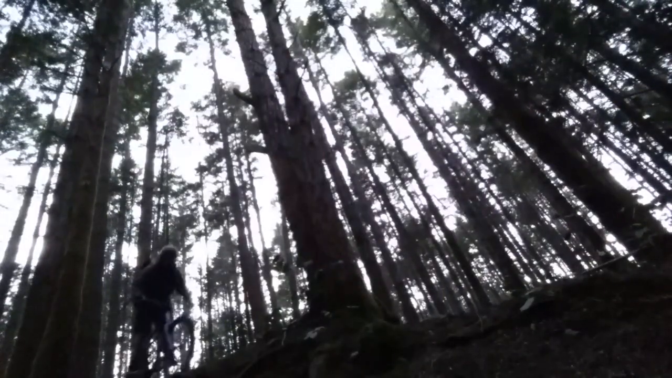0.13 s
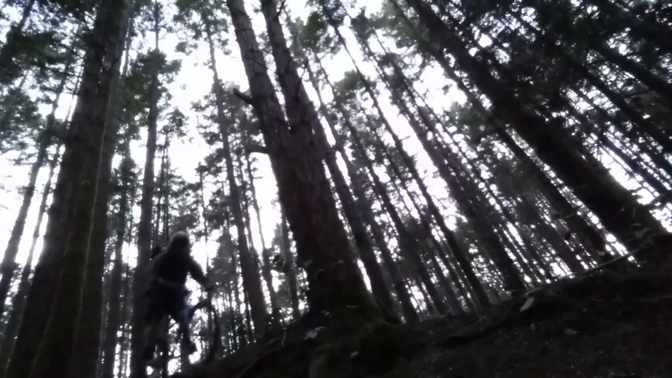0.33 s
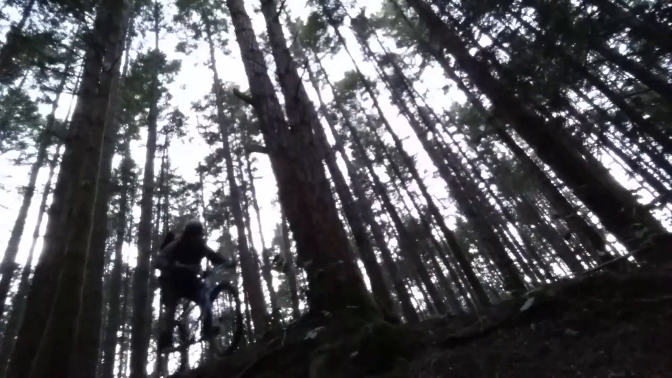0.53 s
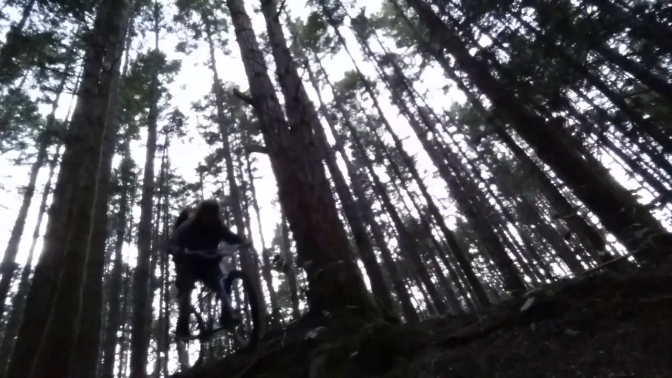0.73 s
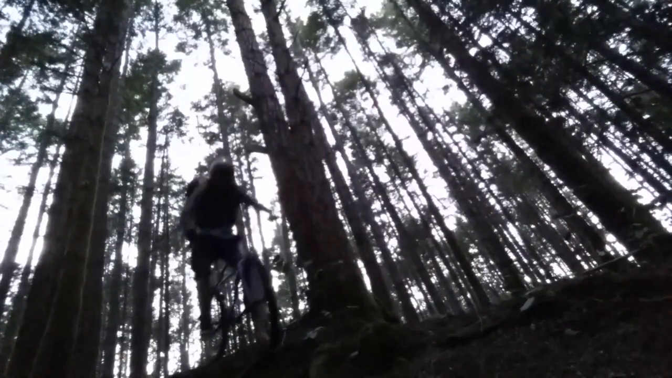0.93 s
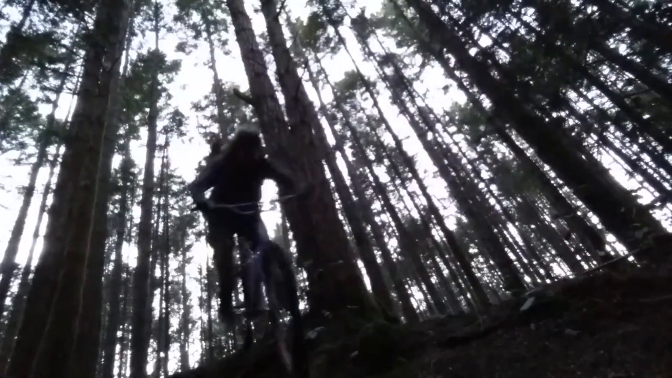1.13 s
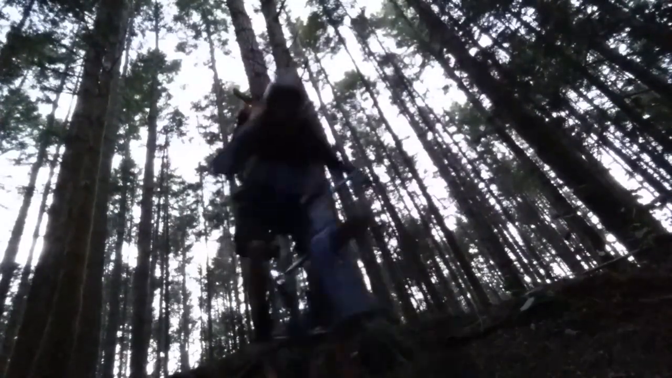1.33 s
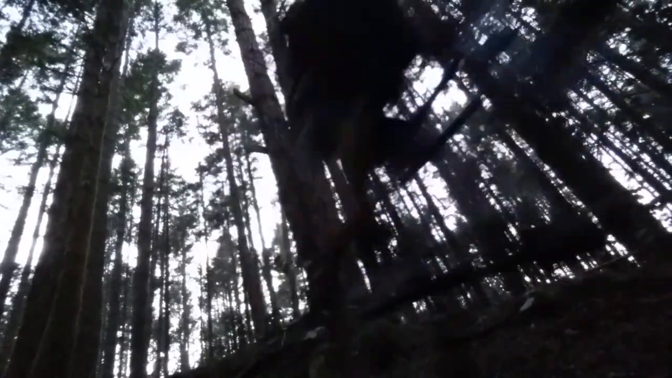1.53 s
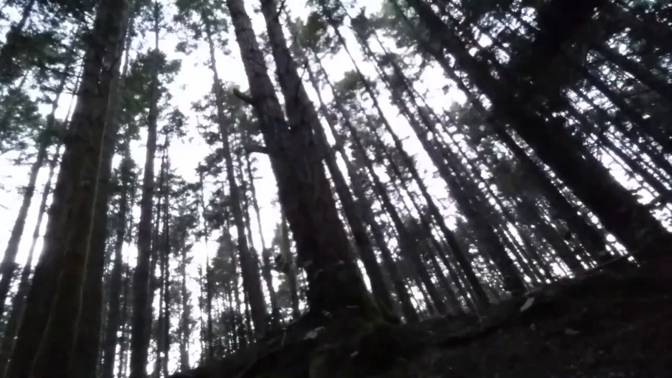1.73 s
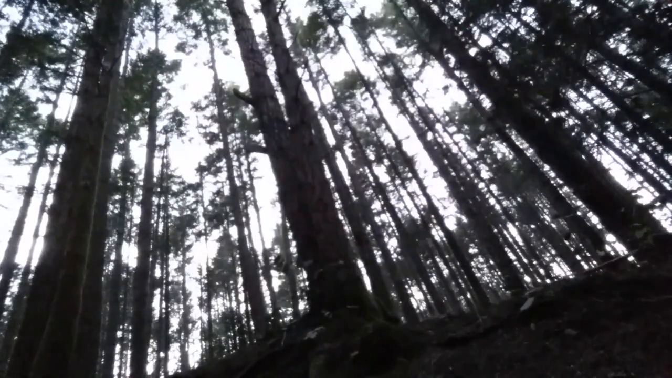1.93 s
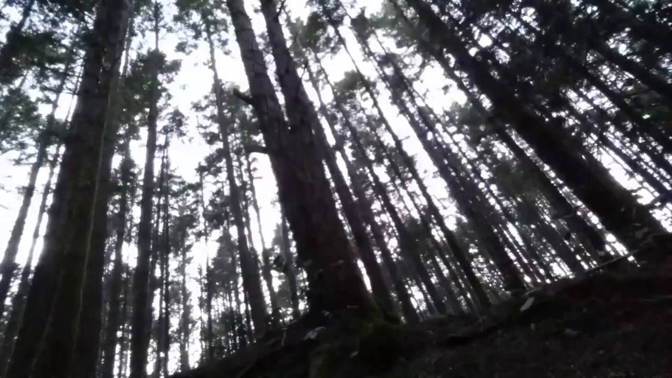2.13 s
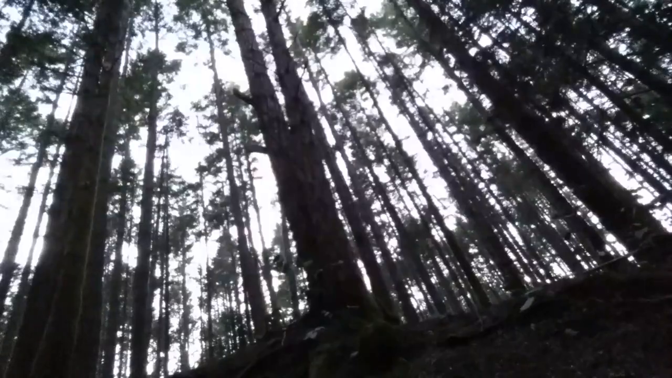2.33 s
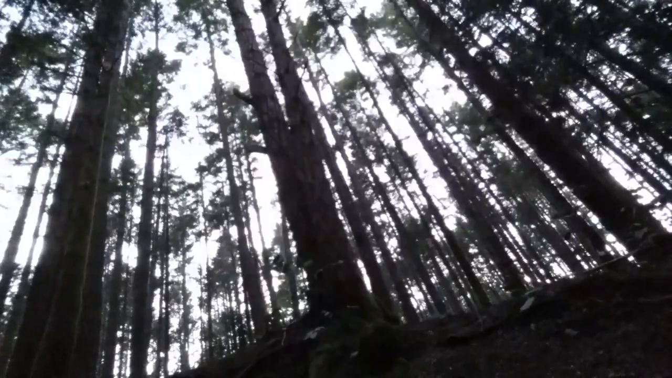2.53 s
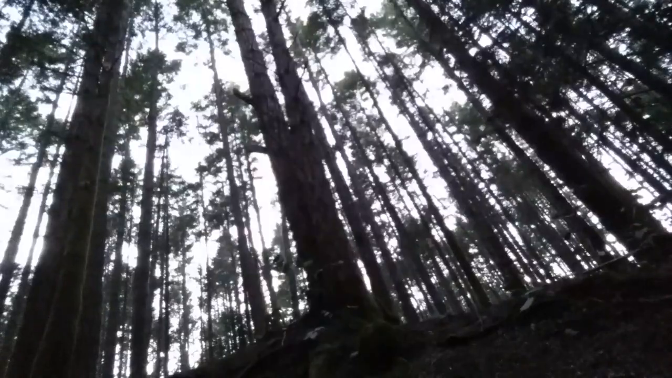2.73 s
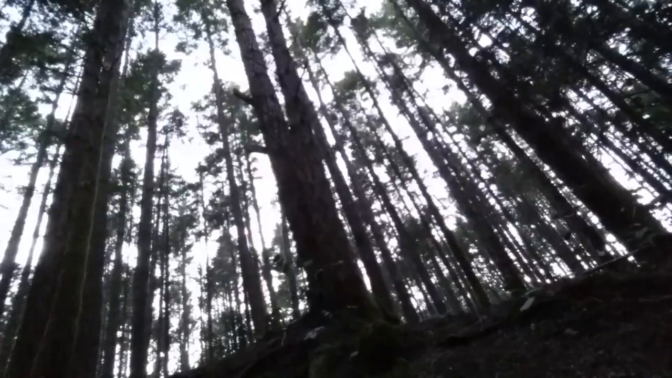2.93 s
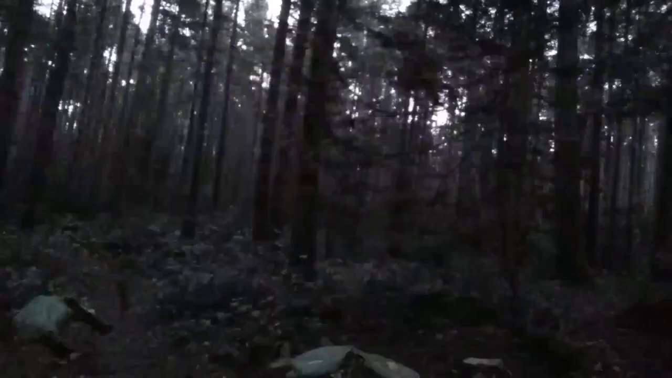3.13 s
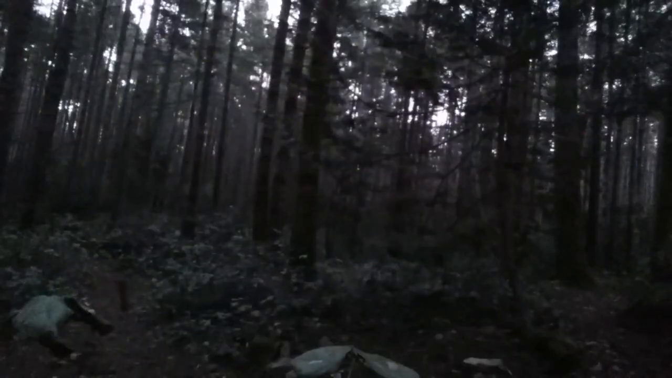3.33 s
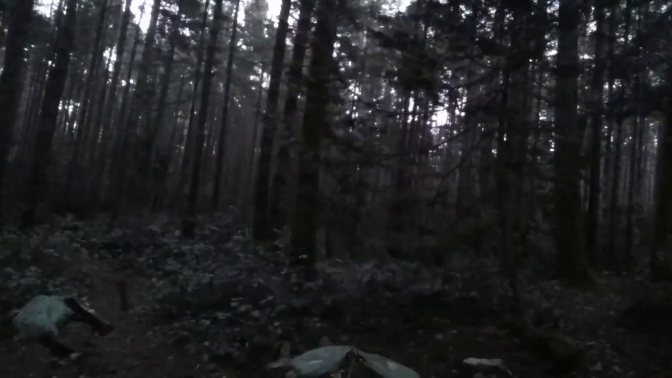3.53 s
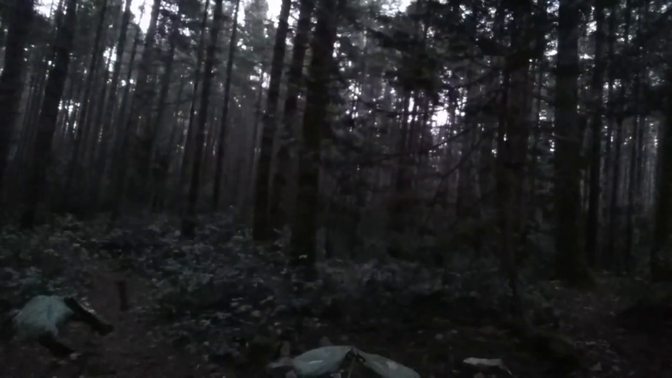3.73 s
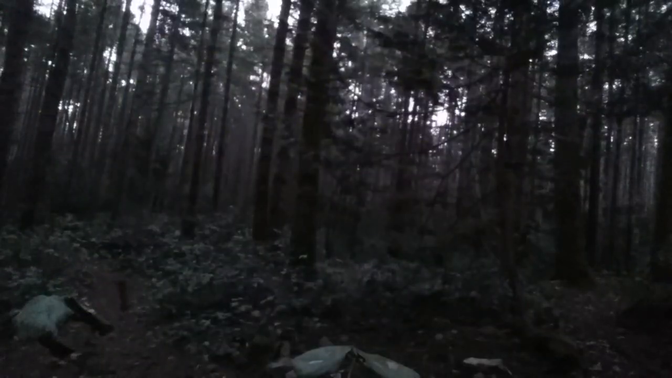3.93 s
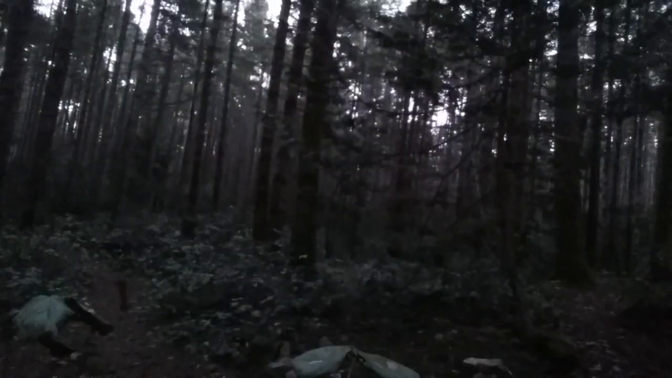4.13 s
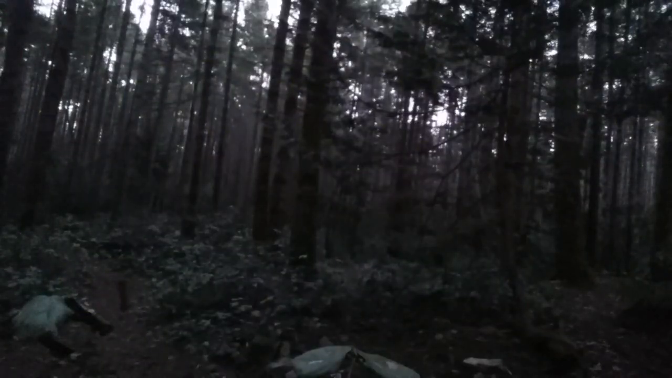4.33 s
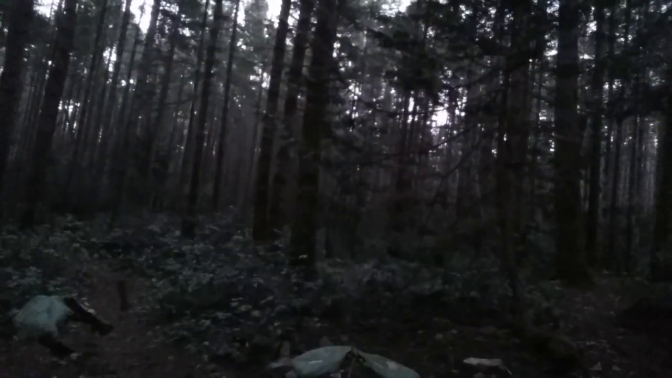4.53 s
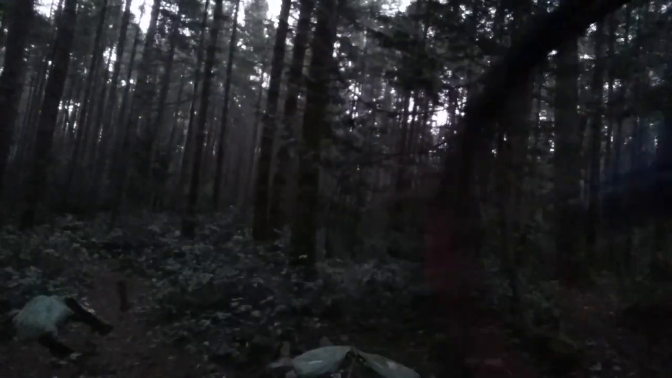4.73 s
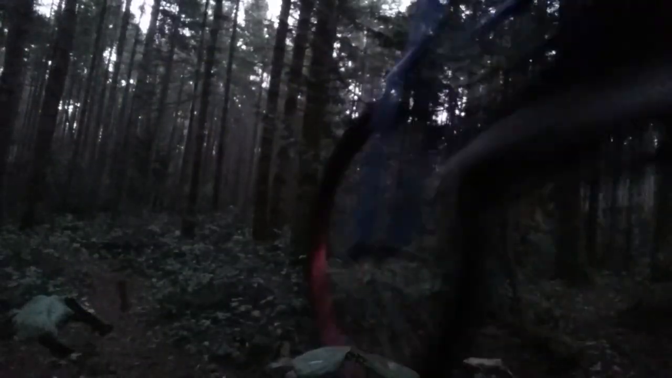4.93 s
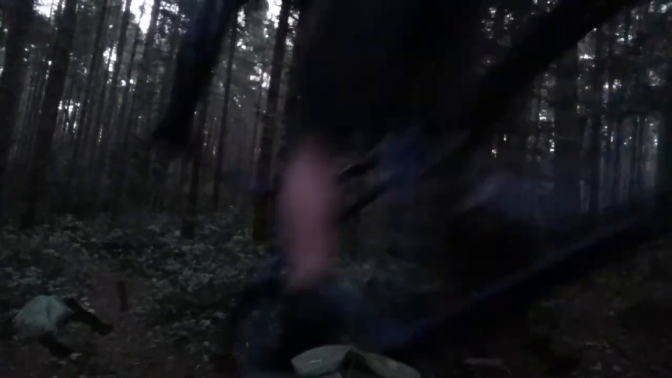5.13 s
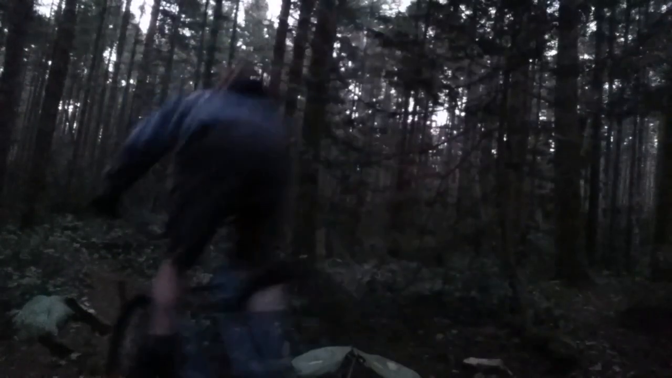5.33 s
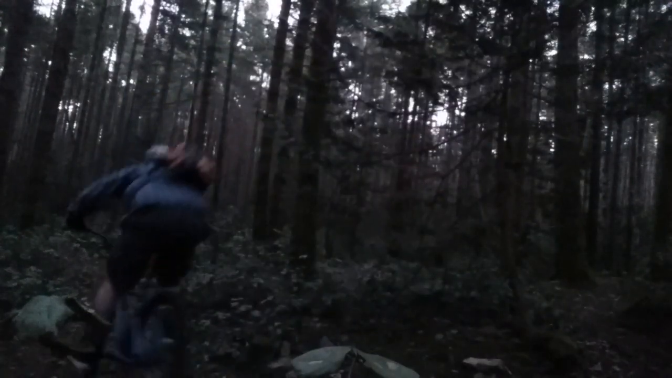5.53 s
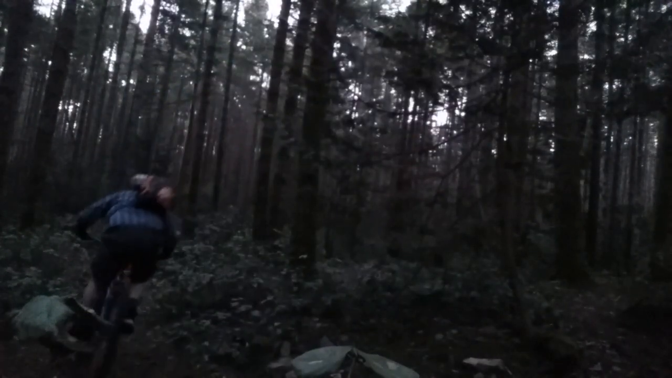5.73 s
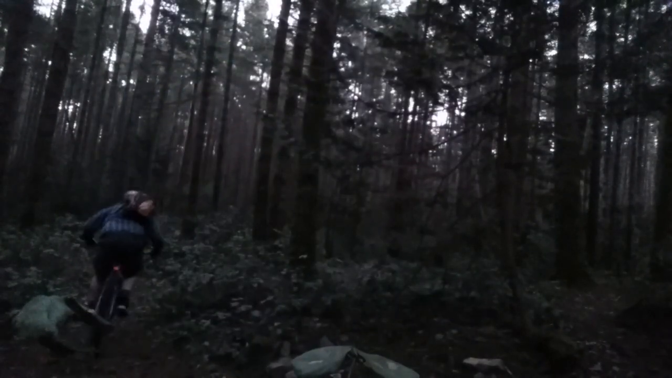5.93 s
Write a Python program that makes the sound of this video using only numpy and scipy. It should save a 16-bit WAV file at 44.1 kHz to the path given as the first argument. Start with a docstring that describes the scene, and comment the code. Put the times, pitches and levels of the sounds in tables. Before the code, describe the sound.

On a quiet forest trail, a faint wavering hum and small twig snaps precede a mountain bike that bursts past close to a small stereo microphone, tyres crunching, chain slapping, wheels thumping and frame knocking. It fades into hiss and low rumble, cuts sharply to near silence, then a second, softer pass brings a metallic ping, two thumps and chain rattle before receding.

```python
"""Beside a forest trail, a mountain bike rolls past a small housing with two microphones; after a hard cut
it passes again. Shaped noise makes the tyres rumble, scrub and crunch on soil; fading tones thump the ground
and ring the frame. Noise bursts snap twigs and slap the chain, metal tones ring, and a low hum wavers.
The two microphone ports of the housing colour the treble very differently."""
import sys
import numpy as np
from scipy import signal
from scipy.io import wavfile
from scipy.ndimage import uniform_filter1d, map_coordinates

SR = 44100
rng = np.random.default_rng(int(sys.argv[2]) if len(sys.argv) > 2 else 0)


def waveform_to_disk(signal):
    """Save audio, clipped to [-1, 1], as 16-bit WAV at the path in sys.argv[1]."""
    frames = np.transpose(np.atleast_2d(signal))
    scaled = np.clip(frames, -1, 1) * 32767
    samples = np.round(scaled).astype(np.int16)
    wavfile.write(sys.argv[1], SR, samples)


N = 267907

# Low tone, up to the cut: (time [s], level [dB])
HUM_CURVE = [(0., -54), (.5, -47), (.85, -48.5), (1.2, -46), (1.4, -47.5), (1.6, -48), (2.05, -43),
             (2.17, -36), (2.45, -34), (3.02, -42), (3.15, -38.5)]
# Where the bike is: (time [s], left minus right level [dB], left port lags right [ms])
BEARING_CURVE = [(0, -4.5, .23), (.7, -8.5, 0.25), (1.2, -6, 0.16), (1.5, -2.5, -0.15), (1.7, 0.5, -0.36),
                 (2., 7, -0.47), (2.25, 4.5, -0.33), (2.8, 4.5, -0.31), (3.2, 6, -0.29), (3.7, 3.5, -0.38),
                 (4.5, 8.5, -0.53), (4.95, 10, -0.4), (5.25, 5, -0.16), (5.5, -2, 0.01), (6.07, 1, 0.18)]
# Rolling noise, one list per pass:
# (time [s], ground rumble [dB], tread scrub [dB], clod crunch [dB], grit hiss [dB])
TYRE_CURVES = [
    [(0.0, -63, -88.5, -85, -95), (0.28, -58.5, -75, -92, -97), (0.55, -59.5, -71, -88, -86.5),
     (0.84, -56, -65.5, -103, -90), (1.1, -48, -63.5, -85, -78.5), (1.4, -60, -62, -76, -72.5),
     (1.44, -37, -41.5, -53, -60), (1.53, -37, -39, -46, -52), (1.6, -41, -33.5, -39, -49),
     (1.82, -34, -36.5, -40, -46.5), (2.08, -26, -42, -40, -40.5), (2.27, -34.5, -52, -48, -46.5),
     (2.45, -40.5, -54.5, -61.5, -56), (2.7, -38.5, -41.5, -56, -50), (2.85, -42, -42, -54.5, -46.5),
     (3.0, -48, -53, -61.5, -53), (3.15, -47, -64, -63.5, -56.5)],
    [(3.3, -57.5, -85.5, -85.5, -94), (3.75, -63, -87.5, -94, -96.5), (4.0, -59.5, -81, -83, -92),
     (4.22, -58, -77.5, -79, -80), (4.36, -60, -76, -77, -82), (4.5, -61, -79.5, -82.5, -90.5),
     (4.75, -55.5, -69.5, -69, -79.5), (4.86, -46, -61, -54, -63), (4.95, -39.5, -63, -50, -51),
     (5.02, -47.5, -65, -58.5, -51), (5.19, -49, -65.5, -61.5, -61), (5.29, -47.5, -62.5, -55, -61),
     (5.33, -33, -48, -41, -47), (5.42, -40.5, -57.5, -51, -57), (5.48, -39.5, -51, -42, -62),
     (5.63, -49, -63, -57, -72), (5.85, -50.5, -56.5, -66, -71), (6.07, -48.5, -56.5, -63.5, -69)],
]
# Tone colour of the ground rumble: (frequency [Hz], level [dB])
RUMBLE_COLOUR = [(12, -43.5), (20, -8.5), (60, 6.5), (150, -3), (205, -11), (260, -13), (340, -21.5),
                 (570, -120)]
# A pebble rattling off the brake disc: (time [s], level of the tick [dB])
PEBBLE_HITS = [(5.0193, -8.5), (5.0254, -13), (5.0324, -22), (5.0394, -19.5), (5.0541, -27)]
# Ringing tones of the brake disc, before an extra fade: (frequency [Hz], level [dB], time to fall 60 dB [s])
DISC_TONES = [(10410, -8, 0.23), (10580, 0, 0.19), (11220, -15, 0.17), (12030, -13, 0.26),
              (12480, -23, 0.2), (12870, -10, 0.083), (13010, -13, 0.18), (13450, -16, 0.11),
              (14300, -37, 0.37)]
# Chain slaps: (time [s], level of the bright burst [dB], time to fall 60 dB [s])
CHAIN_SLAPS = [(0.373, -65.5, .051), (0.4372, -58, 0.11), (1.131, -58, 0.028), (1.4196, -24, 0.081),
               (1.4565, -30, 0.1), (1.5148, -13, 0.088), (1.571, -20, 0.1), (1.6287, -21, .1),
               (1.704, -19, 0.02), (1.7474, -26, 0.17), (1.7876, -26, 0.39), (1.8284, -12.5, .043),
               (1.8464, -24, .055), (1.9031, -22, .085), (1.9112, -11.5, 0.056), (1.925, -15, 0.021),
               (1.952, -19.5, 0.037), (1.981, -16, 0.057), (2.036, -21, .07), (2.0792, -18, 0.042),
               (2.0987, -11, 0.027), (2.1087, -17, 0.028), (2.1246, -30, .049), (2.138, -14.5, 0.024),
               (2.1773, -13.5, 0.042), (2.219, -26, 0.11), (2.243, -19.5, .074), (2.2995, -25, 0.054),
               (2.3586, -35.5, 0.1), (2.428, -26, .13), (2.569, -31, 0.13), (2.7377, -29, 0.14),
               (2.944, -34, 0.056), (4.771, -48, 0.066), (4.993, -36, 0.034), (5.265, -38, 0.14),
               (5.316, -23, 0.058), (5.379, -36, .11), (5.4168, -33.5, .07), (5.4655, -12, 0.043),
               (5.5, -37, 0.043), (5.5292, -24, 0.032), (5.658, -44.5, .065), (5.8548, -46, 0.1)]
# Ringing tones of the chain, before an extra fade: (frequency [Hz], level [dB], time to fall 60 dB [s])
CHAIN_TONES = [(5545, -2, 0.13), (10720, -3, 0.12), (10870, 0, 0.11), (11050, -10, 0.25),
               (11420, -14, 0.37), (12510, -16, 0.85)]
# Twigs and stones snapping under the tread: (time [s], level before panning [dB], pitch [Hz])
TWIG_SNAPS = [(0.312, -59, 740), (0.424, -53, 679), (0.729, -48.5, 660), (0.998, -35, 570),
              (1.05, -37, 560), (1.091, -44, 594), (1.131, -44.5, 694), (1.179, -44.5, 619),
              (1.328, -45.5, 860), (1.406, -25.5, 590), (1.442, -33, 685), (1.512, -20, 670),
              (1.542, -22, 850), (1.563, -23, 1300), (1.591, -22, 1100), (1.62, -22, 900),
              (1.665, -29.5, 720), (1.728, -23, 1250), (1.752, -26, 1996), (1.771, -27, 606),
              (1.808, -18.5, 694), (1.873, -27, 755), (1.881, -21.5, 2170), (1.927, -23, 610),
              (1.977, -18.5, 2050), (2.022, -27, 632), (2.047, -25.5, 1900), (2.059, -20.5, 2200),
              (2.081, -22, 730), (2.134, -27.5, 2810), (2.212, -23.5, 850), (2.422, -29.5, 880),
              (2.531, -22.5, 760), (2.594, -30, 640), (2.619, -31, 829), (2.637, -26, 660),
              (2.694, -32, 708), (2.79, -33, 760), (4.243, -60, 740), (4.368, -60, 1835),
              (4.75, -52.5, 638), (4.777, -55.5, 636), (4.849, -41, 780), (4.932, -39, 900),
              (5.037, -44, 1950), (5.062, -39.5, 1800), (5.124, -40.5, 1900), (5.224, -50, 770),
              (5.302, -31, 730), (5.336, -28, 704), (5.459, -28.5, 700), (5.468, -24.5, 1880),
              (5.529, -38, 1640), (5.604, -38, 715), (5.655, -44, 640), (5.763, -47, 600),
              (5.86, -47, 1300), (6.057, -41, 650)]
# Wheels landing on roots and soil:
# (time [s], level before panning [dB], pitch it settles to [Hz], time to fall 60 dB [s])
WHEEL_THUMPS = [(1.408, -17, 60.7, 0.26), (1.521, -24, 75.4, 0.27), (1.7, -29, 68, 0.2),
                (1.806, -17, 72.7, 0.24), (1.892, -23.5, 57.4, 0.41), (2.04, -20.5, 152, 0.21),
                (2.1, -26, 66, 0.3), (4.852, -41.5, 106.7, 0.36), (4.971, -27, 59.8, 0.23),
                (5.298, -19, 69.8, 0.31), (5.458, -21.5, 68.7, 0.32), (5.52, -30, 91.4, 0.17)]
# Blows that ring the frame: (time [s], level before panning [dB], time to fall 60 dB [s])
FRAME_KNOCKS = [(1.051, -31.5, .051), (1.093, -36.5, 0.069), (1.129, -41, 0.15), (1.41, -20.5, 0.066),
                (1.541, -14.5, 0.051), (1.789, -23, 0.14), (1.811, -16, 0.073), (1.9, -33, 0.56),
                (2.045, -26.5, 0.16), (2.134, -21.5, 0.11), (2.211, -20, 0.046), (2.423, -34, 0.071),
                (2.523, -36, 0.13), (2.741, -32, 0.11), (4.929, -42.5, 0.28), (5.224, -31, .12),
                (5.3, -40, 0.072), (5.459, -33.5, 0.096), (5.764, -39, 0.089), (5.96, -38.5, 0.15),
                (5.984, -43, .15), (6.057, -30.5, 0.098)]
# Ringing tones of the frame: (frequency [Hz], level [dB])
FRAME_TONES = [(287.4, 0.5), (247.2, -10), (338, -11)]
# Gain of each microphone port: (frequency [Hz], left [dB], right [dB])
PORT_GAINS = [(19.74, -6, -8.5), (314, 7, 7), (2140, -1.02, -5), (3128, -8, -8.5), (4100, -16, -10.5),
              (5060, -25, -6.5), (6290, -21.5, 7), (6660, -40.5, -2.5), (7845, -43, -37.5),
              (8260, -22, -49.5), (9740, -3, -46), (9940, 4.5, -33.5), (10980, 10.5, -18),
              (11900, 7.5, -14.5), (13800, 0.5, -9.5)]

# near silence lasts a third of the gap; full level is back after 1.3 gaps
CUT_S, CUT_GAP_S = 3.21, 0.045
HUM_HZ = 98.36
WHEEL_HZ, FIRST_DIP_S, DIP_DB, THROB_END_S = 3.08, 0.026, -20, 1.16  # one hum dip per wheel turn
TRUNKS_DB, TRUNKS_T60_S = -10, 0.27  # T60: time to fall 60 dB
# the band near 6 kHz enters by the right port and is shaded as the bike moves left
GRIT_CENTRE_DB, GRIT_DB_PER_DB = -4, -1.7  # level with the bike at centre; change per dB of bearing
SLAP_CENTRE_DB, SLAP_DB_PER_DB = -8.5, -2.2
DISC_DB, DISC_FADE_S = -10.5, 0.036
CHAIN_DB, LINK_DB = -27.5, -14.5  # high chain tones; the lowest one, before shading
CRUNCH_PAN, SNAP_PAN = 0.47, 0.77  # share of the bearing that these wider sources follow
SNAP_CYCLES = 26  # cycles of its own pitch for a snap to fall 60 dB
CRACK_DB, CRACK_FOLLOWS = -11.5, 0.45  # the crack grows where the crunch outweighs the scrub
HEAVE_HZ = 42
BUZZ_DB = -1.5  # the frame buzz lies midway between rumble and scrub, plus this
HISS_DB = -89.5
EDGE_HZ, TOP_HZ = 14600, 15750  # treble shelf; final cut


def undb(db):
    """Turn decibels into a plain gain."""
    return 10 ** (np.asarray(db) / 20)


def unit(x):
    """Scale a sound to an average strength (rms) of 1."""
    return x / np.sqrt(np.mean(x ** 2))


def colour(x, hz, db):
    """Filter through (Hz, dB) points without sounding early, by folding the log gain's cepstrum forward."""
    size = 8192
    f = np.maximum(np.arange(size // 2 + 1) * SR / size, 1)
    log_gain = np.interp(np.log(f), np.log(hz), db) * np.log(10) / 20
    ceps = np.fft.irfft(log_gain)
    ceps[1:size // 2] *= 2
    ceps[size // 2 + 1:] = 0
    impulse = np.fft.irfft(np.exp(np.fft.rfft(ceps)))
    return signal.fftconvolve(x, impulse)[:N]


def band(x, lo_hz, hi_hz, order=2):
    """Keep only the pitches between two limits."""
    sos = signal.butter(order, [lo_hz, hi_hz], "band", fs=SR, output="sos")
    return signal.sosfilt(sos, x)


def walk(rate):
    """Random wavering: levels held 1 / rate seconds, then smoothed twice."""
    k = int(SR / rate)
    steps = np.repeat(rng.standard_normal(N // k + 1), k)
    return 1.22 * uniform_filter1d(uniform_filter1d(steps, k), k)[:N]


def grains(rate, spread_db, bed_db):
    """Scattered clicks, about rate a second, of uneven but bounded size over a fine hiss."""
    hit = rng.random(N) < rate / SR
    size = np.minimum(rng.exponential(size=N), 2.2)
    sign_noise, hiss = rng.standard_normal((2, N))
    clicks = hit * np.sign(sign_noise) * undb(spread_db * size)
    return unit(clicks) + undb(bed_db) * hiss


def crumble(lo_hz, hi_hz, tilt_db, patchy_db, rate, count):
    """Clods break up: cracks click across all pitches, while crumbs of each size hiss in their own patches."""
    edges = np.geomspace(lo_hz, hi_hz, count + 1)
    cracks = grains(rate, 3.63, -13.5)
    out = np.zeros(N)
    for k, (lo, hi) in enumerate(zip(edges, edges[1:])):
        crumbs = undb(-0.5 + patchy_db * walk(30)) * rng.standard_normal(N)
        out += undb(tilt_db * k) * unit(band(cracks + crumbs, lo / 1.13, hi * 1.262))  # bands overlap
    return unit(out)


def columns(passes):
    """Turn the curve rows of the two passes into smooth controls that jump at the cut."""
    t = np.arange(N) / SR
    first, second = (np.transpose(rows) for rows in passes)
    return [np.where(t < CUT_S, np.interp(t, first[0], a), np.interp(t, second[0], b))
            for a, b in zip(first[1:], second[1:])]


def add(out, s, x):
    """Mix x into out from time s."""
    i = int(s * SR)
    out[..., i:i + x.shape[-1]] += x[..., :N - i]


def since(control, s, length):
    """Read a stretch of a control from time s, wrapping round at the end."""
    return np.roll(control, -int(s * SR))[:length]


def pair(make, pan_db, apart):
    """One source at both ports; a share arrives by separate paths and is unrelated."""
    share = np.clip(apart, 0, 1)
    both = np.sqrt(1 - share) * make() + np.sqrt(share) * np.array([make(), make()])
    return both * undb(np.array([pan_db, -pan_db]) / 2)


def fade(t60, attack_s):
    """Times and loudness shape of a blow: quick rise, steady dying away, at most 0.4 s."""
    t = np.arange(int(0.4 * SR)) / SR
    return t, (1 - np.exp(-t / attack_s)) * np.exp(-np.log(1000) * t / max(t60, 0.005))


def burst(env, lo_hz, hi_hz, channels):
    """Noise between two pitches under a loudness shape, peak 1."""
    x = env * band(rng.standard_normal((channels, len(env))), lo_hz, hi_hz)
    return x / np.abs(x).max()


def ring(t, modes):
    """Metal rings as several dying tones, each starting at a random point of its cycle."""
    out = np.zeros(len(t))
    for hz, db, t60 in modes:
        phase = 2 * np.pi * rng.random()
        out += undb(db) * np.exp(-np.log(1000) * t / t60) * np.sin(2 * np.pi * hz * t + phase)
    return np.minimum(t / 0.00062, 1) * out


def bearing(s):
    """Left minus right level of the bike at times s, in dB."""
    return np.interp(s, *np.transpose(BEARING_CURVE)[:2])


def trunks(x):
    """Trunks and slope scatter the sharp sounds given here into a short noisy tail."""
    t, env = fade(TRUNKS_T60_S, 0.004)
    tail = env * rng.standard_normal((2, len(t)))
    tail /= np.sqrt(np.sum(tail[0] ** 2))
    return x + undb(TRUNKS_DB) * signal.fftconvolve(x, tail, axes=1)[:, :N]


def hum():
    """A low tone that dips once a wheel turn as the bike nears and holds as it leaves, wavering slightly."""
    t = np.arange(N) / SR
    hz = HUM_HZ * (1 + 0.012 * walk(15))
    dips = DIP_DB * (t < THROB_END_S) * np.abs(np.cos(np.pi * WHEEL_HZ * (t - FIRST_DIP_S))) ** 4
    db = np.interp(t, *np.transpose(HUM_CURVE)) + dips + 0.5 * walk(5.4)
    tone = np.sqrt(2) * np.sin(2 * np.pi * np.cumsum(hz) / SR)
    return tone * undb(db) * (t < CUT_S)


def grit():
    """Fine grit and needles hiss under the tread: dense clicks in two treble bands."""
    top_db = columns(TYRE_CURVES)[3]
    mid_db = top_db + GRIT_CENTRE_DB + GRIT_DB_PER_DB * bearing(np.arange(N) / SR)
    top = pair(lambda: unit(band(grains(2800, 6.6, 0.1), 8000, 16000)), np.zeros(N), 0.63)
    mid = pair(lambda: unit(band(grains(2500, 4.2, 0.12), 4200, 6830)), np.zeros(N), 0.64)
    return undb(1.6 * walk(72)) * (undb(top_db) * top + undb(mid_db) * mid)


def pings():
    """A pebble ticks on the brake disc, which rings with a clear but chattering tone."""
    out = np.zeros((2, N))
    chatter = undb(2.1 * walk(300))
    for s, db in PEBBLE_HITS:
        t, env = fade(0.01, 0.0002)
        clear = ring(t, DISC_TONES) * np.exp(-t / DISC_FADE_S) * since(chatter, s, len(t))
        tick = burst(env, 11500, 13700, channels=2)
        add(out, s, undb(db) * (undb(DISC_DB) * clear + tick))
    return out


def chain():
    """Chain slaps are bright noise bursts with a little metal ring."""
    out = np.zeros((2, N))
    for s, db, t60 in CHAIN_SLAPS:
        mid_db = SLAP_CENTRE_DB + SLAP_DB_PER_DB * bearing(s)
        t, env = fade(t60, 0.0014)
        bright = burst(env, 9100, 19000, channels=2)
        mid = undb(mid_db) * burst(env, 4400, 8000, channels=2)
        high_ring = undb(CHAIN_DB) * ring(t, CHAIN_TONES[1:])
        low_ring = undb(LINK_DB + mid_db) * ring(t, CHAIN_TONES[:1])
        rings = (high_ring + low_ring) * np.exp(-t / 0.045)
        add(out, s, undb(db) * (bright + mid + rings))
    return out


def snaps():
    """Each snap is a short noise burst around its own pitch with a sharper crack on top."""
    out = np.zeros((2, N))
    _, scrub_db, crunch_db, _ = columns(TYRE_CURVES)
    bright_db = crunch_db - scrub_db
    for s, db, hz in TWIG_SNAPS:
        _, env = fade(SNAP_CYCLES / hz, 0.0008)
        pan_db = SNAP_PAN * bearing(s)
        body = burst(env, hz / 1.44, hz * 1.42, channels=1)
        crack_db = CRACK_DB + CRACK_FOLLOWS * bright_db[int(s * SR)]
        crack = undb(crack_db) * burst(env ** 2, 1500, 2900, channels=1)
        add(out, s, undb(db + np.array([[pan_db], [-pan_db]]) / 2) * (body + crack))
    return out


def bumps():
    """Thumps sag in pitch as the tyre spreads; knocks ring the frame, roughened by rattle."""
    out = np.zeros(N)
    for s, db, hz, t60 in WHEEL_THUMPS:
        t, env = fade(t60, 0.0017)
        soil_heave = undb(db - 7) * np.sin(2 * np.pi * HEAVE_HZ * t) * np.exp(-t / 0.05)
        sagging_t = t + 0.0066 * (1 - np.exp(-t / 0.0025))  # runs fast at first, so the pitch starts high
        add(out, s, soil_heave - undb(db) * env * np.sin(2 * np.pi * hz * sagging_t))
    rattle = 1 + 0.25 * walk(60)
    for s, db, t60 in FRAME_KNOCKS:
        t, env = fade(t60, 0.0041)
        tones = sum(undb(g) * np.sin(2 * np.pi * hz * t) for hz, g in FRAME_TONES)
        add(out, s, undb(db) * env * tones * since(rattle, s, len(t)))
    return out * undb(np.array([[1.2], [-1.2]]))  # slightly louder on the left


def tyres():
    """Rolling noise: the ground rumbles, the frame buzzes, the tread scrubs and crunches."""
    rumble_db, scrub_db, crunch_db, _ = columns(TYRE_CURVES)
    buzz_db = (rumble_db + scrub_db) / 2 + BUZZ_DB
    scrub_pan = bearing(np.arange(N) / SR)
    centre = np.zeros(N)
    rumble = pair(lambda: unit(colour(rng.standard_normal(N), *np.transpose(RUMBLE_COLOUR))), centre, 0.2)
    buzz = pair(lambda: crumble(190, 570, -2.4, 2.1, 60, count=3), centre, 0.13)
    scrub = pair(lambda: crumble(600, 1016, -1.4, 3.1, 110, count=2), scrub_pan, 0.3)
    crunch = pair(lambda: crumble(1200, 3400, 0.046, 2.2, 120, count=3), CRUNCH_PAN * scrub_pan, 0.86)
    lumps = walk(45)  # uneven ground loads the tread in bursts
    return (rumble * undb(rumble_db + 2.2 * walk(7.4)) + buzz * undb(buzz_db + 3.3 * lumps)
            + scrub * undb(scrub_db + 1.6 * lumps) + crunch * undb(crunch_db + 3.1 * lumps))


def scene():
    """Mix all sources, delay the left port by direction, and dip almost to silence at the cut."""
    out = hum() + grit() + pings() + trunks(snaps() + chain()) + bumps() + tyres()
    i = np.arange(N)
    lag = np.interp(i / SR, *np.transpose(BEARING_CURVE)[::2]) * SR / 1000  # ms to samples
    out[0] = map_coordinates(out[0], [i - lag], order=5, mode="nearest")
    after_cut_s = i / SR - CUT_S
    return out * np.where(after_cut_s < 0, 1, np.clip(after_cut_s / CUT_GAP_S - 0.3, 0.03, 1))


def record(dry):
    """Each port has its own cavity resonances; a shelf drops the highest treble and the recorder cuts the top."""
    hz, *gains = np.transpose(PORT_GAINS)
    ports = np.array([colour(x, hz, db) for x, db in zip(dry, gains)])
    ports = ports + undb(HISS_DB) * rng.standard_normal(dry.shape)  # preamplifier hiss
    shelf = signal.ellip(6, 0.5, 24, EDGE_HZ, fs=SR, output="sos")
    top_cut = signal.ellip(12, 0.2, 80, TOP_HZ, fs=SR, output="sos")
    return signal.sosfilt(top_cut, signal.sosfilt(shelf, ports))


dry = scene()
out = record(dry)
waveform_to_disk(out)
```